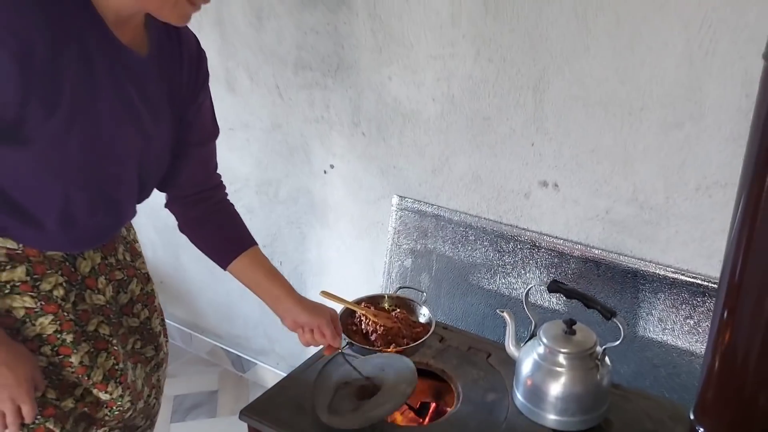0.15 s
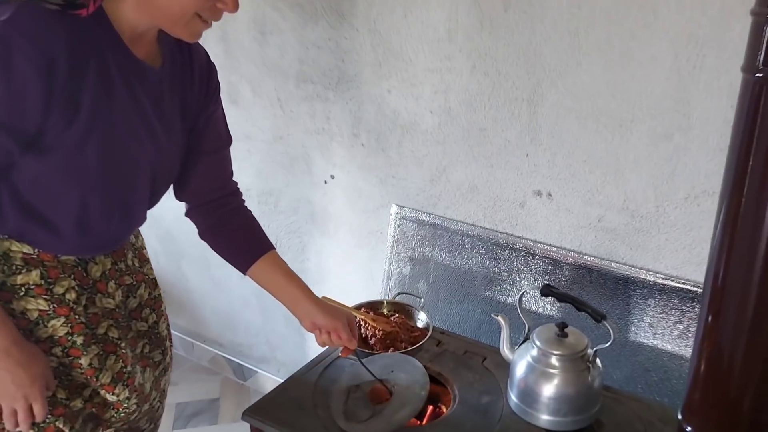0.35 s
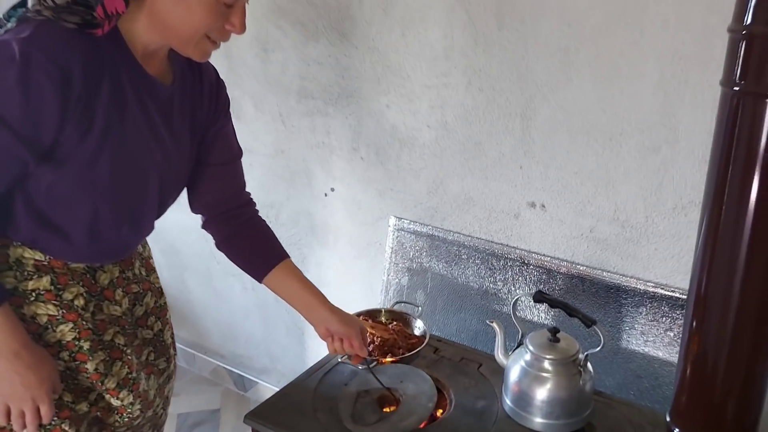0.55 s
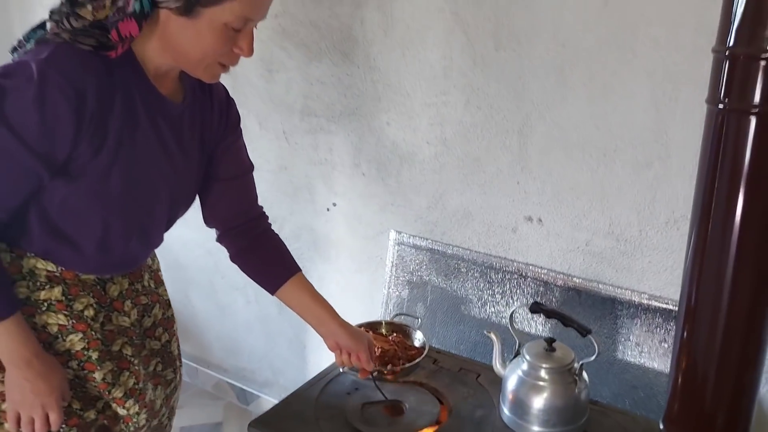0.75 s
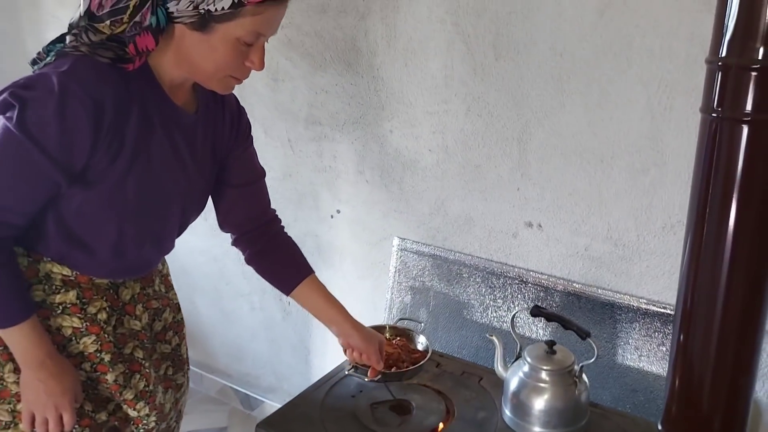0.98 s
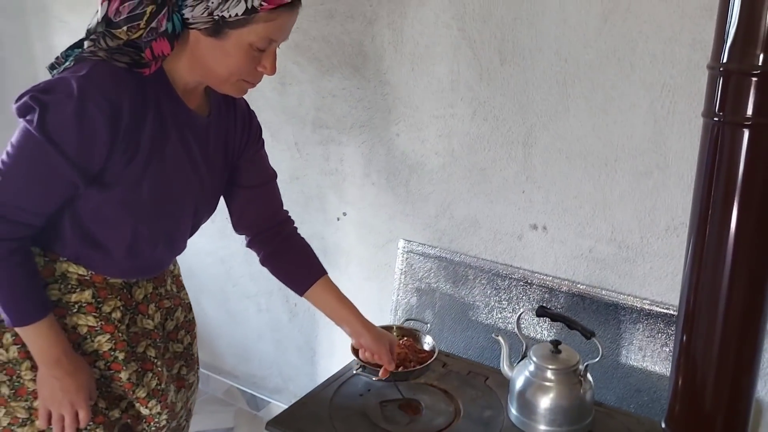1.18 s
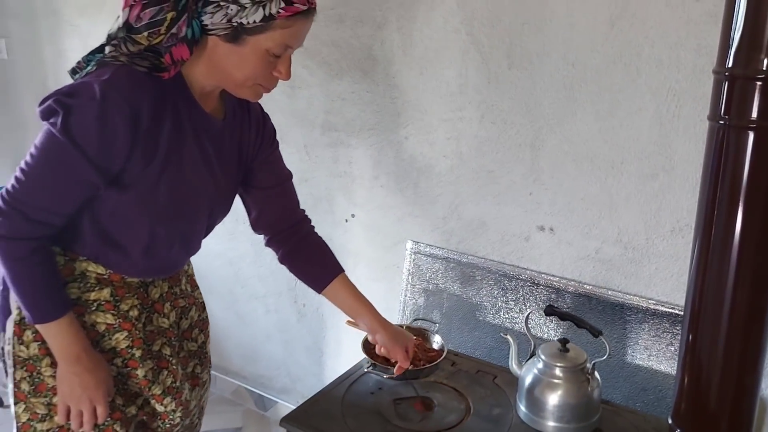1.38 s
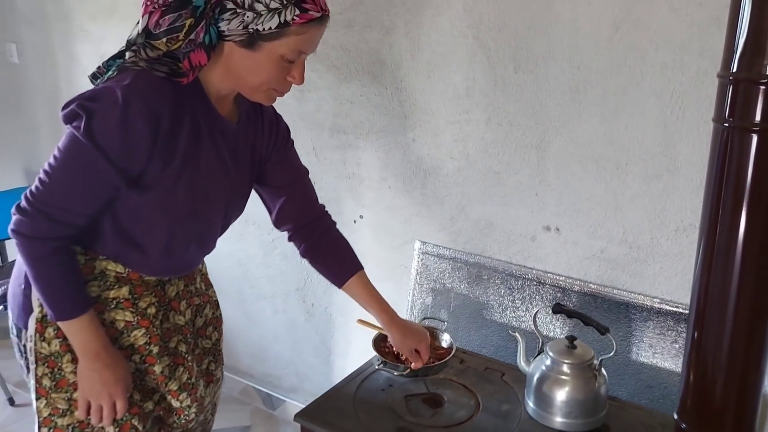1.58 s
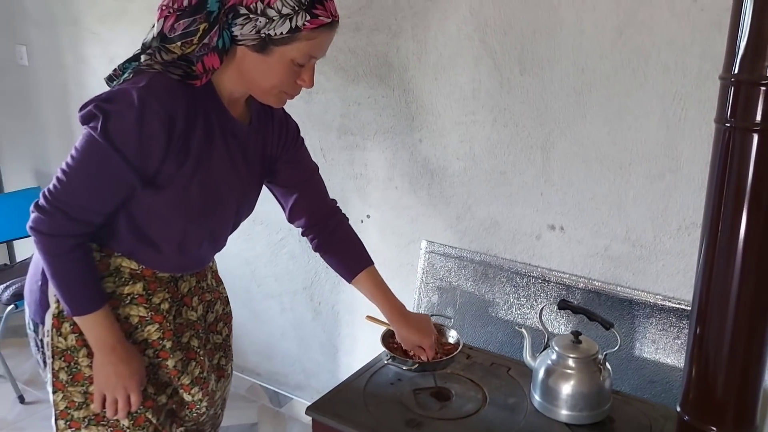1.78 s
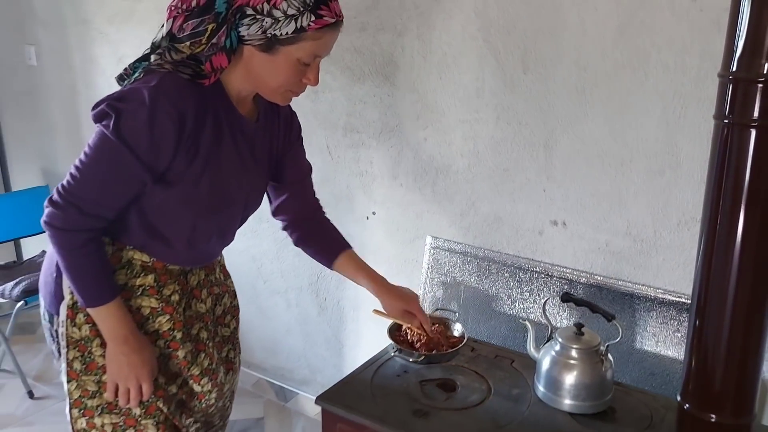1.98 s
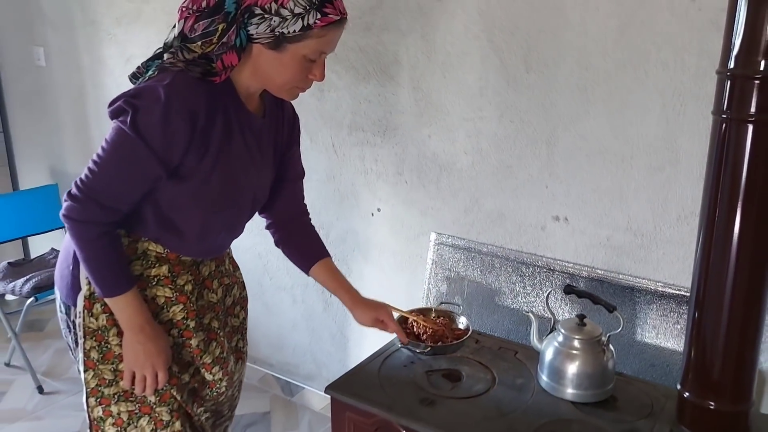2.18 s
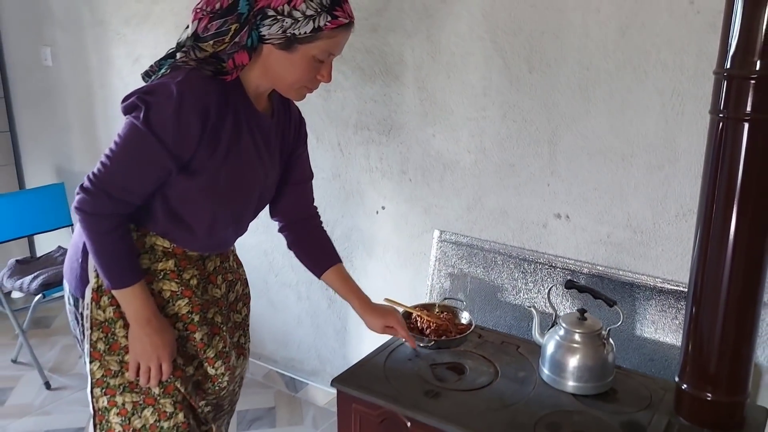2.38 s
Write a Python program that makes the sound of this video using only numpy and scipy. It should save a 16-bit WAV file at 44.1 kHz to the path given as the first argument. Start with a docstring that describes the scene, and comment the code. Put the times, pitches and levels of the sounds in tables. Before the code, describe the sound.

Iron stove lid dragged into place, grinding and knocking over a low fire rumble.

```python
"""Grinding, juddering and clanking iron: a lid is dragged over a wood stove in a bare kitchen.
Stick-slip friction rings the cast-iron lid and the hollow stove, which booms below.
The lid strikes the rim of the fire hole and knocks into its seat. The fire rumbles throughout.
At the end a steel pan on the stove top is rubbed softly, then nudged, and rings."""
import sys
import numpy as np
from scipy import signal
from scipy.io import wavfile
from scipy.ndimage import uniform_filter1d

SR = 44100
rng = np.random.default_rng(int(sys.argv[2]) if len(sys.argv) > 2 else 0)


def generate_wav(sig):
    """Save sig (samples, or channels by samples) to the path in sys.argv[1] as 16-bit PCM at SR."""
    pcm = np.round(np.clip(np.atleast_2d(sig).T, -1, 1) * 32767).astype(np.int16)
    wavfile.write(sys.argv[1], SR, pcm)


N = 108045
TIME_S = np.arange(N) / SR
RING_SAMPLES = 24000

# Decay of iron and kitchen together. Each row: frequency in Hz, t60 in seconds.
RING_T60_S = [(80, 0.25), (300, 0.62), (800, 0.61), (2000, 0.39), (5000, .33), (12000, 0.3)]
# Stereo width. Each row: frequency in Hz, left-right correlation.
CORRELATION = [(60, 1), (130, .94), (260, 0.94), (500, .45), (1000, 0), (4000, 0.16), (12000, -.1)]
# Stereo balance. Each row: frequency in Hz, left over right in dB.
BALANCE_DB = [(60, 2.2), (250, 0.6), (1000, 5), (2500, -1), (6000, 0), (9500, 1.5), (13000, 7.5)]

# Spectra of fire, pan, drag and knock. Each row: frequency in Hz, relative density in dB.
FIRE_SPECTRUM = [(30, -14.5), (50, -4), (105, 0), (180, -8.5), (300, -8.5), (500, -20), (1000, -29),
                 (1800, -43.5), (3500, -52.5), (12000, -44.5), (16000, -49)]
PAN_SPECTRUM = [(100, -10.5), (400, 1.5), (800, -3.5), (1200, -5), (2200, 0.5), (3100, -7.5), (4500, -2.5),
                (6500, -8), (9000, -11.5), (12000, -13.5), (15500, -20.5)]
JUDDER_SPECTRUM = [(30, -32.5), (45, -14), (65, -2.5), (130, -4), (200, -3), (290, 1), (400, -10),
                   (600, -32), (1200, -52.5), (4000, -89.5)]
GRIND_SPECTRUM = [(200, -29.5), (400, 3), (600, 3), (900, 4), (1300, -3), (1800, -7), (3000, -33),
                  (7000, -70)]
GRIT_SPECTRUM = [(600, -28.5), (1300, -4), (2000, 5.5), (2800, -8.5), (4000, 0), (6300, -14.5), (9000, -18),
                 (12000, -14.5), (15500, -23.5)]
CLANK_SPECTRUM = [(150, -23.5), (400, 0.5), (900, -2.5), (1400, -2.5), (2200, 0.5), (4300, 0.5),
                  (6500, -6.5), (9000, -7), (12000, -11), (15500, -17.5)]

# Body modes. Each row: frequency in Hz, relative level in dB, t60 in seconds, left over right in dB.
PAN_MODES = [(821, -18, .4, 0), (1409, -17, .4, 0), (1990, -11, .45, 0), (2140, -14, .4, 0),
             (2394, -15, .4, 0), (2586, -10, .5, 0), (3445, -13, .3, 0), (3594, -14, .2, 0),
             (4150, -19, .3, 0), (4290, -18, .3, 0), (4500, -17, .3, 0), (5080, -18, .3, 0),
             (6515, -19, .3, 0), (11880, -23, .15, 0)]
STOVE_MODES = [(97.7, -9, 0.25, -0.5), (136.46, -5.5, 0.49, -1.5), (193.5, -10, .3, -4.5),
               (282.1, -3, .16, -0.5), (379, -11, .3, 2.5), (590.3, -12, .15, 0.5), (870, -16, .3, 0.5),
               (1036, -18.5, 0.34, 1)]
LID_MODES = [(815, -20, .4, 0), (1647, -18, .3, 0), (1940, -18, .3, 0), (2284, -20, .3, 0),
             (2875, -20, .3, 0), (3413, -19, .3, -2), (3940, -19, .25, 0), (4407, -15, .2, 7),
             (4742, -21, .25, 0), (5577, -18, .2, -7), (8083, -22, .2, 3), (8995, -18, .15, 12),
             (10380, -24, .12, 6), (12125, -23, .14, 4)]

# Fire rumble. Each row: time in seconds, level in dB.
FIRE_DB = [(0, -43.5), (1.5, -48), (1.9, -49), (2.08, -55.5), (2.22, -48), (2.45, -54.5)]
# Pan rim strokes. Each row: start and length in seconds, singing and hissing band gains in dB.
RIM_STROKES = [(1.597, .11, -74, -59), (1.68, 0.063, -58, -66), (1.786, 0.098, -51, -62),
               (1.912, 0.054, -57.5, -64)]
# A faint scuff of handling near the pan, heard through the pan. Each row: time in seconds, level in dB.
SCUFF_DB = [(2.17, -96), (2.195, -66.5), (2.25, -90), (2.33, -75), (2.355, -50), (2.45, -66)]
# Touches on the pan. Each row: start in seconds, level in dB, treble lift in dB.
PAN_NUDGES = [(2.358, -62, 14.5), (2.374, -51.5, 8.5), (2.383, -57, -7), (2.392, -48.5, -22),
              (2.432, -58, -8)]
# Lid groans. Each row: start in seconds, length in seconds, pitch in Hz, level in dB.
LID_GROANS = [(0.072, 0.071, 600, -35), (.13, .14, 96.95, -37), (.16, .12, 591, -39.5),
              (0.213, 0.069, 280, -28), (0.449, 0.056, 78.1, -30), (0.532, 0.098, 138, -38),
              (0.664, 0.11, 894, -37.5), (0.789, 0.058, 300, -30.5), (0.868, 0.184, 277.7, -33),
              (1.175, 0.045, 885, -35.5)]
# Lid friction. Each row: time in seconds, then low judder, mid grind and treble grit in dB.
DRAG_DB = [(0, -53.5, -52, -68), (.06, -50, -52.5, -54), (.11, -36.5, -37.5, -54), (.17, -32, -37.5, -46),
           (.225, -27.5, -30, -36.5), (.29, -30.5, -29.5, -40), (0.378, -22.5, -26.5, -23),
           (.44, -33, -34.5, -44), (.54, -30, -39, -58), (.62, -39.5, -40, -50), (.69, -37, -37, -49),
           (.75, -33, -37.5, -34), (.80, -29, -35.5, -48), (.85, -28, -36.5, -37.5),
           (.90, -27, -30.5, -33.5), (0.979, -30, -33.5, -31.5), (1.03, -33, -42, -72),
           (1.101, -42.5, -51, -77), (1.16, -46, -50, -54), (1.207, -32.5, -43, -36),
           (1.25, -37.5, -45, -45), (1.315, -37.5, -44, -48), (1.36, -54, -61, -79),
           (1.42, -46.5, -52, -74.5), (1.55, -55, -84, -95), (1.7, -87.5, -95, -100)]
# Grit dulls once the lid is seated. Each row: time in seconds, treble lift in dB.
GRIT_LIFT_DB = [(0, 7), (.3, -1.5), (.7, -0.5), (.97, 1), (1.08, -4), (1.4, -10.5)]
# Iron on iron. Each row: start in seconds, clank in dB, treble lift in dB, thud in dB.
LID_KNOCKS = [(.122, -59, 5.5, -72), (0.31, -29.5, 5, -38.5), (.472, -54, 4, -49), (.541, -71.5, 18, -75),
              (.655, -72, 14.5, -67), (.69, -62.5, 4, -62), (0.7818, -39, -1, -53.5),
              (.880, -44.5, -0.5, -51), (.924, -37.5, -6, -54), (1.021, -84, -6, -50.5),
              (1.179, -51.5, -9, -52.5), (1.405, -76, -18, -64)]


def from_db(db):
    """Decibels to gain."""
    return 10 ** (np.asarray(db) / 20)


def at_hz(points, hz):
    """Table value on a log-frequency axis."""
    knots_hz, values = np.transpose(points)
    return np.interp(np.log(hz), np.log(knots_hz), values)


def curve(points):
    """Time table as one value per sample."""
    return np.interp(TIME_S, *np.transpose(points))


def stereo_gains(balance_db):
    """Left and right gains for a level difference."""
    return from_db(np.array([[balance_db], [-balance_db]]) / 2)


def unit_energy(x):
    """Scale to a mean channel energy of one."""
    return x / np.sqrt(np.mean(np.sum(x ** 2, axis=-1)) + 1e-20)


def bandpass(x, edges_hz, order=2):
    """Butterworth band-pass."""
    return signal.sosfilt(signal.butter(order, edges_hz, "band", fs=SR, output="sos"), x)


def treble_shelf(force, lift_db, corner_hz=6000):
    """Harder contact lifts the treble."""
    dull = signal.lfilter(*signal.butter(1, corner_hz, fs=SR), force)
    return dull + from_db(lift_db) * (force - dull)


def noise_bands(spectrum, samples):
    """Third-octave stereo noise; yields centre in Hz, noise pair, gains."""
    edges_hz = 25 * 2 ** (np.arange(29) / 3)
    white = rng.standard_normal((2, 2, samples + SR // 10))
    for k, (low_hz, high_hz) in enumerate(zip(edges_hz, edges_hz[1:])):
        mid, side = bandpass(white[k % 2], [low_hz, high_hz])[:, -samples:]
        hz = np.sqrt(low_hz * high_hz)
        correlation = at_hz(CORRELATION, hz)
        pair = np.sqrt(1 + correlation) * mid + np.sqrt(1 - correlation) * side * [[1], [-1]]
        gain = from_db(at_hz(spectrum, hz)) * np.sqrt(high_hz - low_hz)
        yield hz, pair, gain * stereo_gains(at_hz(BALANCE_DB, hz))


def dense_ring(spectrum, early_db=1, early_s=0.022):
    """Close modes and room reflections, decaying band by band."""
    t = TIME_S[:RING_SAMPLES]
    early_boost = 1 + from_db(early_db) * np.exp(-t / early_s)
    ring = 0
    for hz, pair, gain in noise_bands(spectrum, RING_SAMPLES):
        decay = from_db(-60 * t / at_hz(RING_T60_S, hz))
        ring += gain * unit_energy(pair * early_boost * decay)
    return unit_energy(ring)


def modal_ring(modes, split_hz=12):
    """Clear modes of a body; high ones beat with close partners and differ in phase between ears."""
    t, ring = TIME_S[:RING_SAMPLES], 0
    for hz, db, t60_s, balance_db in modes:
        correlation = np.clip(at_hz(CORRELATION, hz), 0, 1)
        phase = rng.uniform(0, 2 * np.pi) + np.array([[0], [np.arccos(correlation) * rng.choice([-1, 1])]])
        partner_hz = hz + split_hz * np.array([[1], [-1]])
        partner = np.sin(2 * np.pi * partner_hz * t + rng.uniform(0, 2 * np.pi, (2, 1)))
        tone = np.sin(2 * np.pi * hz * t + phase) + .5 * (1 - correlation) * partner
        ring += from_db(db) * stereo_gains(balance_db) * unit_energy(tone * from_db(-60 * t / t60_s))
    return ring


def reflection_ripple(ring, max_db=8, width_hz=89):
    """Early reflections off wall and stove top: narrow peaks and dips colour the treble."""
    alpha = np.pi * width_hz / SR
    out = []
    for channel in ring:
        sections = []
        for hz in np.linspace(1300, 15000, 70) + rng.uniform(-90, 90, 70):
            root_gain = from_db(max_db / 2 * rng.uniform(-1, 1))
            tuning = -2 * np.cos(2 * np.pi * hz / SR)
            b = [1 + alpha * root_gain, tuning, 1 - alpha * root_gain]
            a = [1 + alpha / root_gain, tuning, 1 - alpha / root_gain]
            sections.append(np.array(b + a) / a[0])
        out.append(signal.sosfilt(sections, channel))
    return np.array(out)


def excite(force, ring):
    """Contact force played through a body."""
    return signal.fftconvolve(force[None], ring, axes=1)[:, :N]


def friction(level_db, slips_per_s=2500, spread_db=4.5):
    """Force of tiny random slips of uneven size."""
    sizes = from_db(spread_db * np.minimum(rng.exponential(1, N), 4)) * rng.choice([-1, 1], N)
    slips = sizes * (rng.random(N) < slips_per_s / SR)
    return slips / slips.std() * from_db(level_db)


def impact(start_s, db, lift_db, chatter_per_s=2500, decay_s=0.007, chatter_share=.75):
    """Force of one contact and the brief chatter of the rims."""
    t = TIME_S[:SR // 10]
    chatter = rng.standard_normal(len(t)) * (rng.random(len(t)) < chatter_per_s / SR)
    force = np.sqrt(chatter_share) * unit_energy(chatter * np.exp(-t / decay_s))
    force[0] = np.sqrt(1 - chatter_share)
    force = treble_shelf(force, lift_db)
    return from_db(db) * np.sqrt(SR) * np.pad(force, (int(start_s * SR), N))[:N]


def fire(draught_hz=(305, 415), draught_db=-65.5):
    """Rumble and faint hiss of the fire, plus the hollow note of the flue draught."""
    rumble = unit_energy(sum(gain * unit_energy(pair) for _, pair, gain in noise_bands(FIRE_SPECTRUM, N)))
    draught = unit_energy(bandpass(rng.standard_normal(N), draught_hz))
    return np.sqrt(N) * (rumble * from_db(curve(FIRE_DB)) + from_db(draught_db) * draught)


def rim_strokes(sing_hz=(1830, 2280), hiss_hz=(3940, 6550)):
    """Light friction on the pan rim, swelling and fading with each stroke."""
    force = 0
    for k, band_hz in enumerate((sing_hz, hiss_hz)):
        swell = sum(from_db(gains_db[k]) * np.sin(np.pi * np.clip((TIME_S - start_s) / length_s, 0, 1))
                    for start_s, length_s, *gains_db in RIM_STROKES)
        force += swell * bandpass(friction(0), band_hz, order=3)
    return force


def steel_pan(held_t60_ratio=.35):
    """Faint rubbing, damped by the hand; then quick touches ring the thin steel."""
    rub = friction(curve(SCUFF_DB)) + rim_strokes()
    touches = sum(impact(*nudge) for nudge in PAN_NUDGES)
    shell = reflection_ripple(dense_ring(PAN_SPECTRUM))
    held_modes = [(hz, db, t60_s * held_t60_ratio, balance_db) for hz, db, t60_s, balance_db in PAN_MODES]
    free_ring = unit_energy(shell + modal_ring(PAN_MODES))
    held_ring = unit_energy(shell + modal_ring(held_modes))
    return excite(touches, free_ring) + excite(rub, held_ring)


def lid_groans(wobble_at_1khz_hz=36.6, attack_s=0.017, release_s=0.023):
    """Near-periodic stick-slip of the lid: short wavering tones."""
    out = 0
    for start_s, length_s, hz, db in LID_GROANS:
        wobble = uniform_filter1d(rng.standard_normal(N), size=200)
        pitch_hz = hz + wobble_at_1khz_hz * np.sqrt(hz / 1000) * wobble / wobble.std()
        rise = (TIME_S - start_s) / attack_s
        fall = (start_s + length_s - TIME_S) / release_s
        envelope = np.clip(np.minimum(rise, fall), 0, 1)
        ear_phase = np.array([[0], [np.arccos(at_hz(CORRELATION, hz))]])
        tone = np.sqrt(2) * np.sin(2 * np.pi * np.cumsum(pitch_hz) / SR + ear_phase)
        out += from_db(db) * stereo_gains(at_hz(BALANCE_DB, hz)) * envelope * tone
    return out


def lid_knocks(mode_spread_db=2.5):
    """Knocks clank the lid and thud in the stove; each hits a new spot and favours other modes."""
    clank_ring = reflection_ripple(dense_ring(CLANK_SPECTRUM))
    clanks, thuds = 0, np.zeros(N)
    for start_s, clank_db, lift_db, thud_db in LID_KNOCKS:
        modes = [(hz, db + mode_spread_db * rng.uniform(-1, 1), t60_s, balance_db)
                 for hz, db, t60_s, balance_db in LID_MODES]
        clanks += excite(impact(start_s, clank_db, lift_db), clank_ring + modal_ring(modes))
        thuds[int(start_s * SR)] = from_db(thud_db) * np.sqrt(SR)
    stove_ring = unit_energy(dense_ring(JUDDER_SPECTRUM) + modal_ring(STOVE_MODES))
    return clanks + excite(thuds, stove_ring)


def lid_drag(stove_body_db=-2.5, stove_modes_db=-3.5, lid_modes_db=-4.5):
    """Sliding friction excites the lid and the hollow stove under it."""
    times_s, *levels_db = np.transpose(DRAG_DB)
    judder_db, grind_db, grit_db = [np.interp(TIME_S, times_s, db) for db in levels_db]
    judder = excite(friction(judder_db + stove_body_db), dense_ring(JUDDER_SPECTRUM))
    boom = excite(friction(judder_db + stove_modes_db), modal_ring(STOVE_MODES))
    grind = excite(friction(grind_db), dense_ring(GRIND_SPECTRUM))
    grit_force = treble_shelf(friction(grit_db), curve(GRIT_LIFT_DB))
    lid_ring = reflection_ripple(dense_ring(GRIT_SPECTRUM)) + from_db(lid_modes_db) * modal_ring(LID_MODES)
    return judder + boom + grind + excite(grit_force, lid_ring)


def scene(left_lag_s=.0001):
    """Lid, pan and fire; the stove stands slightly right, so the left channel lags."""
    left, right = lid_drag() + lid_knocks() + lid_groans() + steel_pan() + fire()
    return np.array([np.interp(TIME_S - left_lag_s, TIME_S, left), right])


def record(dry, low_cut_hz=46, high_cut_hz=15800):
    """Bass cut, soft peak clipping, steep top cut."""
    x = signal.sosfilt(signal.butter(3, low_cut_hz, "high", fs=SR, output="sos"), dry)
    rounded = x / (1 + x ** 4) ** .25
    return signal.sosfilt(signal.ellip(10, .2, 80, high_cut_hz, fs=SR, output="sos"), rounded)


dry = scene()
out = record(dry)
generate_wav(out)
```